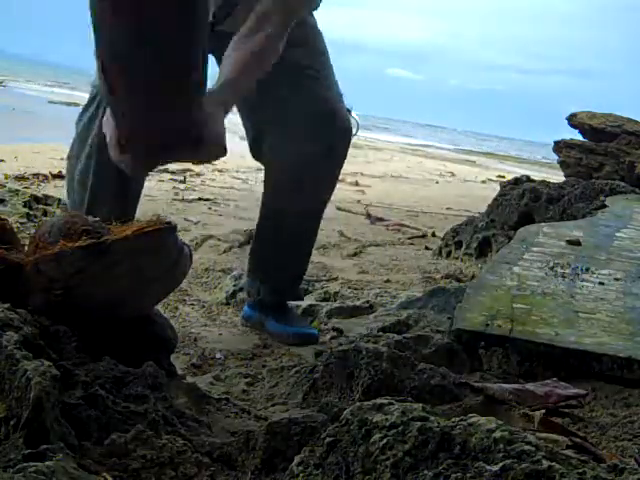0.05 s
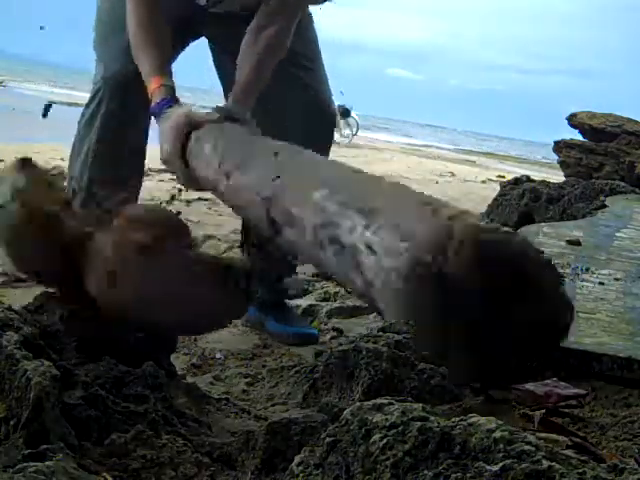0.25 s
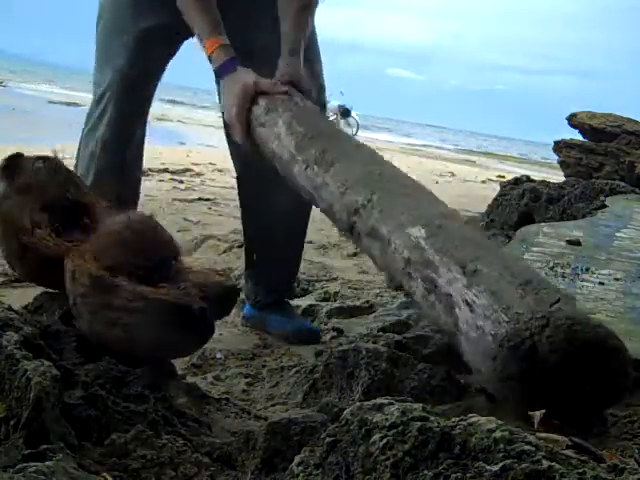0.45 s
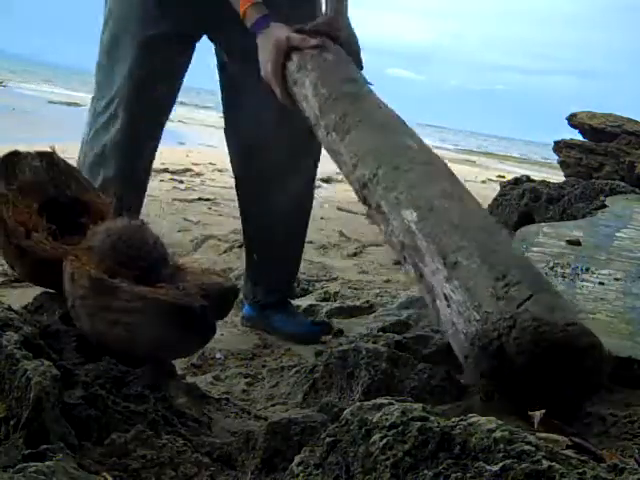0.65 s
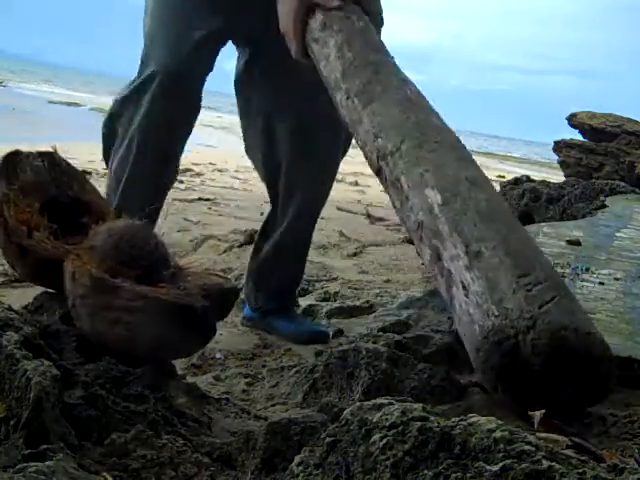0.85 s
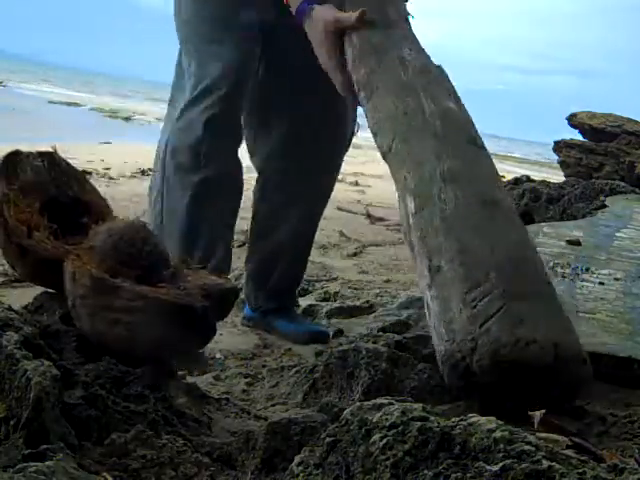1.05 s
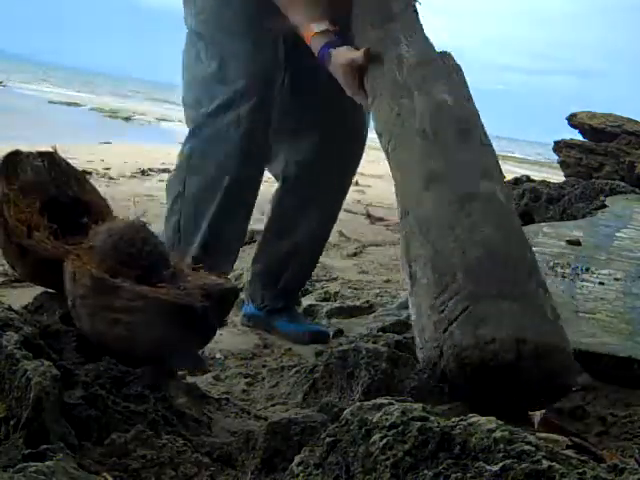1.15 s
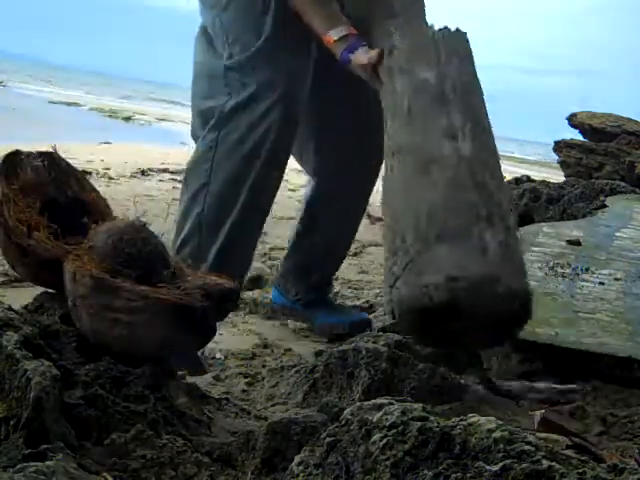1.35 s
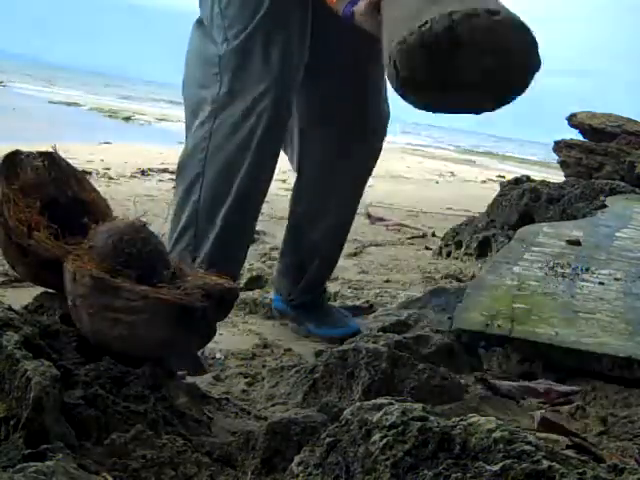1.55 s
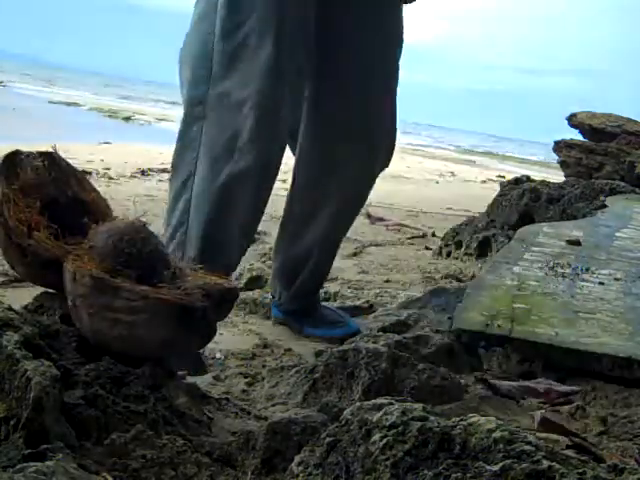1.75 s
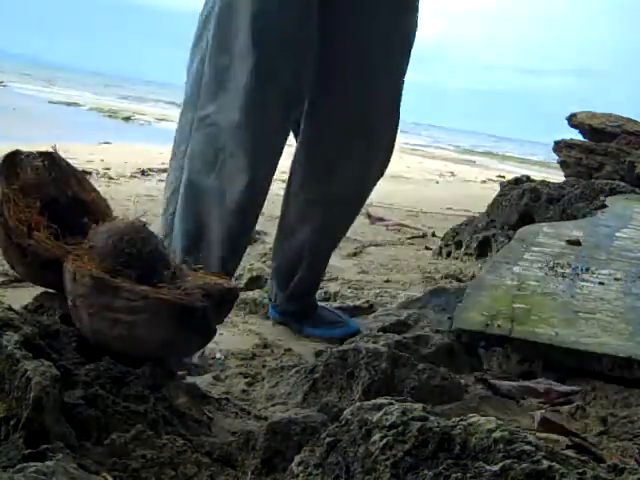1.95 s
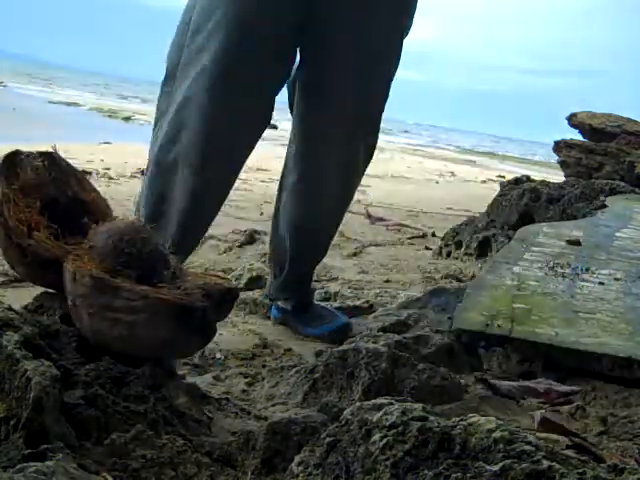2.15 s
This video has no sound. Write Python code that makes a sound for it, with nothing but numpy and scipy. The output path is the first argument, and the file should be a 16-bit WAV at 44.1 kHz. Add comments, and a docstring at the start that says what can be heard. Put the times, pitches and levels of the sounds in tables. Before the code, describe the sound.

Hard, distorted wooden thud of a log striking stone, brief grit, then surf and buffeting wind

```python
"""A windy beach, heard for 2.2 s at two microphone ports: distant surf washes behind from the start, as roar and hiss
of filtered noise, and wind buffets each port on its own, as lumpy low noise and single pressure swings.
After one faint tick a heavy log is slammed onto rock at 0.235 s: a crack of dense grains that overloads the recorder
and a dull wooden ring of decaying modes. Then grit and chips fall, as weaker grains and brief rings."""
import sys
import numpy as np
from scipy import signal
from scipy.fft import rfft, irfft
from scipy.io import wavfile

SR = 44100
rng = np.random.default_rng(int(sys.argv[2]) if len(sys.argv) > 2 else 0)


def wav_out(sig):
    """Save sig, one row per channel (or a flat mono array), as 16-bit PCM at SR to the path in sys.argv[1]."""
    wavfile.write(sys.argv[1], SR, np.round(np.clip(np.atleast_2d(sig).T, -1, 1) * 32767).astype(np.int16))


def volts_from_db(level):
    """Convert decibel levels to linear amplitude ratios."""
    exponent = np.asarray(level, float) / 20
    return 10 ** exponent


N = 97020   # samples, 2.2 s

# How alike the two ports hear surf and grit. Each row: frequency in Hz, likeness from -1 (opposite) to 1 (same).
PORT_LIKENESS = [(60, -0.23), (130, 1), (290, 1), (640, 0.93), (1410, 0.74), (3100, 0.43), (6820, -0.42),
                 (15000, -0.097)]


def rms_one(x):
    """Scale to rms 1."""
    return x / np.sqrt(np.mean(x ** 2) + 1e-20)


def in_time(rows):
    """Columns of a table, after its seconds, as curves in time."""
    s, *columns = np.transpose(rows)
    t = np.arange(N) / SR
    return np.array([np.interp(t, s, column) for column in columns])


def at_hz(points):
    """A spectrum table read on the FFT grid, along log frequency."""
    hz, value = np.transpose(points)
    grid_hz = np.arange(N // 2 + 1) * SR / N
    return np.interp(np.log(grid_hz + 1), np.log(hz), value)


def drift(rate_hz):
    """Slow random wander for two channels, noise through a two-pole lowpass, spread 1."""
    r = np.exp(-2 * np.pi * rate_hz / SR)
    noise = rng.standard_normal((2, N + SR))
    wander = signal.lfilter([1], [1, -2 * r, r * r], noise)
    return rms_one(wander[:, SR:])   # the first second lets the filter settle


def coloured(pair, spectrum, alike):
    """Two unrelated signals mixed to stereo with a likeness per frequency, then coloured; rms 1."""
    mid, side = rfft(pair)
    both = np.sqrt(1 + alike) * mid + np.sqrt(1 - alike) * side * [[1], [-1]]
    return rms_one(irfft(both * volts_from_db(at_hz(spectrum)), N))


def ring(clicks, hz, t60):
    """A two-pole resonator: a unit click sets a decaying sine of starting height 1 ringing."""
    r = volts_from_db(-60 / (t60 * SR))
    w = 2 * np.pi * hz / SR
    return signal.lfilter([0, np.sin(w)], [1, -2 * r * np.cos(w), r * r], clicks + 1e-18)


def panned(db):
    """Gains of left and right for a left-right difference in dB, the nearer side at 1."""
    return volts_from_db(np.array([[min(db, 0)], [min(-db, 0)]]))


def surf():
    """Distant breakers: a low roar and a bright hiss of noise, each flickering a little in level."""
    # Each row: time in seconds, level of the roar in dB, level of the hiss in dB, both before the flicker.
    surf_levels = [(0, -32, -30.5), (.1, -32, -33.5), (.23, -36, -33.5), (.5, -34, -35),
                   (.75, -32.5, -34.5), (1.23, -33.5, -36), (1.67, -35.5, -36.5), (2.2, -34.5, -36)]
    # Spectra of roar and hiss. Each row: frequency in Hz, relative density in dB per Hz.
    roar_spectrum = [(120, -19), (200, -3.5), (400, 0), (530, -1), (610, -4), (700, -10), (1000, -8),
                     (1200, -21.5), (1700, -20.5), (4000, -69)]
    hiss_spectrum = [(700, -9), (1300, 2), (2000, 3), (3000, 0), (4500, 2.5), (9000, 1), (13500, 0.5),
                     (14100, 5), (14400, -45)]
    flicker_db, flicker_hz = 0.77, 5.2
    alike = np.clip(at_hz(PORT_LIKENESS), -1, 1)
    out = 0
    for db, spectrum in zip(in_time(surf_levels), (roar_spectrum, hiss_spectrum)):
        level = volts_from_db(db + flicker_db * drift(flicker_hz)[0])
        out = out + level * coloured(rng.standard_normal((2, N)), spectrum, alike)
    return out


def wind():
    """Turbulence at the ports: lumpy low noise of its own in each, and single pressure swings of about one cycle."""
    # Gusts. Each row: time in seconds, left level in dB, right level in dB, both before the lumps.
    gusts = [(0, -52, -52), (.12, -36, -30.5), (.2, -38, -42), (.3, -26, -29.5), (.45, -26.5, -25),
             (.6, -31.5, -36.5), (.7, -34, -29), (.9, -38, -31), (.97, -60, -44), (1.1, -45, -42),
             (1.3, -39, -40), (1.45, -48, -43.5), (1.6, -48, -37), (1.9, -36.5, -37), (2.05, -44, -40),
             (2.14, -32, -33), (2.2, -45, -43)]
    # Each row: frequency in Hz, relative density in dB per Hz.
    wind_spectrum = [(15, -25), (40, 0.5), (80, 2.5), (130, -0.5), (200, -15), (320, -16), (600, -49)]
    # Single buffets. Each row: centre in seconds, height of the bell in dB at the nearer side,
    # frequency in Hz, left-right difference in dB.
    buffets = [(.15, -18, 114, -17), (0.166, -17, 160, 24), (0.279, -8, 160, -12), (0.29, -9.5, 107, 29),
               (0.352, -15.5, 119, -28), (.403, -4, 200, 5.5), (0.41, -13.5, 120, 2), (.421, -13, 128, 28),
               (0.429, -7, 103, -29), (.453, -10, 224, -24), (.464, -13, 150, 20), (0.545, -15, 178, 28),
               (0.628, -19, 108, -31), (.644, -10.5, 136, -27), (0.673, -9, 163, -11), (.690, -5, 189, -17),
               (0.734, -27, 96, -24), (.789, -7.5, 110, -17), (0.887, -20.5, 81, 6),
               (0.926, -17.5, 121, -22), (1.108, -17, 106, -28), (1.272, -21.5, 110, -12),
               (1.659, -17, 158, 29), (1.846, -21, 86, -24), (1.979, -21, 124, -28),
               (2.015, -19.5, 126, -24), (2.126, -17, 103, -24), (2.139, -14.5, 140, 13),
               (2.103, -26, 110, -24), (2.146, -10.5, 197, -26), (2.157, -10.5, 170, -27),
               (2.181, -17, 136, -24)]
    lumpy_db, lumps_hz = 3, 18
    bell_cycles = 0.32   # standard deviation of a buffet's bell

    level = volts_from_db(in_time(gusts) + lumpy_db * drift(lumps_hz))
    out = level * coloured(rng.standard_normal((2, N)), wind_spectrum, 0)
    t = np.arange(N) / SR
    phases = rng.uniform(0, 2 * np.pi, len(buffets))
    for (s, db, hz, pan_db), phase in zip(buffets, phases):
        cycles = (t - s) * hz
        bell = np.exp(-0.5 * (cycles / bell_cycles) ** 2)
        out = out + panned(pan_db) * volts_from_db(db) * bell * np.cos(2 * np.pi * cycles + phase)
    return out


def ticks():
    """Chips ticking on stone: each is one click that rings a single resonance very briefly."""
    # Each row: start in seconds, level in dB at the nearer side, frequency in Hz,
    # time to fall 60 dB in seconds, left-right difference in dB.
    chips = [(.1376, -21.5, 2630, 0.0064, -1), (.271, -13, 2160, .008, -7), (.4585, -19.5, 990, 0.019, 1),
             (.5335, -24, 2440, 0.011, -6), (.6135, -8.5, 9800, 0.00095, 8), (.703, -23, 8200, .004, 3),
             (1.8098, -19.5, 6840, 0.0032, 1)]
    out = 0
    for s, db, hz, t60, pan_db in chips:
        click = 1.0 * (np.arange(N) == int(s * SR))
        out = out + panned(pan_db) * volts_from_db(db) * ring(click, hz, t60)
    return out


def crunch():
    """Splintering and grit: dense random grains under envelopes that start at once, hold and die."""
    # Each row: start in seconds, level in dB, hold in seconds, time to fall 60 dB in seconds.
    bursts = [(0.2353, -1, 0.0089, 0.019), (0.248, -15.5, 0.014, 0.14), (.4672, -23, 0.0075, .025),
              (.477, -28, 0.0037, 0.023), (.527, -32, 0.01, 0.047), (0.531, -33, 0.06, 0.19)]
    # Each row: frequency in Hz, relative density in dB per Hz.
    grit_spectrum = [(300, -27), (800, 2), (1500, 1), (2500, 2), (4500, 3), (7000, 3), (10000, 4),
                     (13600, 6.5), (14400, -25)]
    grains_per_s, grain_spread_db = 9000, 2.8

    t = np.arange(N) / SR
    envelope = 0
    for s, db, hold, t60 in bursts:
        fall_db = 60 * np.maximum(t - s - hold, 0) / t60
        envelope = envelope + (t >= s) * volts_from_db(db - fall_db)
    size_db = grain_spread_db * np.minimum(rng.exponential(1, (2, N)), 3.5)
    sizes = volts_from_db(size_db) * rng.choice([-1, 1], (2, N))
    grains = sizes * (rng.random((2, N)) < grains_per_s / SR)
    return envelope * coloured(grains, grit_spectrum, np.clip(at_hz(PORT_LIKENESS), -1, 1))


def log():
    """In the short crushing contact many slips strike each mode of the log; the ports hear them slightly apart."""
    # Each row: frequency in Hz, peak of the mode in dB relative to the blow, time to fall 60 dB in seconds.
    modes = [(223, -12, 0.04), (382, -8.5, 0.071), (464, 1, 0.038), (510, -9.5, 0.035), (566, -2, 0.058),
             (894, -1.5, 0.026), (985, -0.5, 0.028), (1130, -13, 0.027), (1690, -12, 0.048),
             (2033, -16, 0.036), (2182, -10, 0.037), (2550, -22, 0.058), (2993, -17.5, 0.066)]
    blow_s, blow_db = 0.2354, 2.5
    contact_s, slips_per_s = 0.005, 2500
    side_share = 0.23   # peak of the left-right difference part, relative to the common part

    t = np.arange(N) / SR - blow_s
    slips = (t >= 0) * (t < contact_s) * (rng.random(N) < slips_per_s / SR)
    out = 0
    for hz, db, t60 in modes:
        mid, side = ring(slips * rng.standard_normal((2, N)), hz, t60)
        mid = mid / np.abs(mid).max()
        side = side_share * side / np.abs(side).max()
        out = out + volts_from_db(blow_db + db) * (mid + side * [[1], [-1]])
    return out


def scene():
    """All sources at the two ports."""
    return surf() + wind() + ticks() + crunch() + log()


def causal(points):
    """Minimum-phase response with the gain of a table, by folding its cepstrum forward in time."""
    cepstrum = irfft(np.log(volts_from_db(at_hz(points))), N)
    cepstrum[1:N // 2] *= 2
    cepstrum[N // 2 + 1:] = 0
    return np.exp(rfft(cepstrum))


def low_pass(x):
    """Removes everything above the highest recorded frequency."""
    return signal.sosfilt(signal.butter(12, 15820, fs=SR, output="sos"), x)


def record(dry):
    """Port colour; gain control sinks after loud peaks; overload is cut flat, then both ends are rolled off."""
    # Response of each microphone port, with its cavity peak. Each row: frequency in Hz, gain in dB.
    left_port = [(200, -1), (3000, 0), (6000, -1), (7000, -2), (8000, 4.5), (8600, 1), (9200, -2.5),
                 (10000, -8), (11000, -12), (13000, -16), (14500, -21), (17000, -16)]
    right_port = [(200, 0.5), (3000, 1), (5000, 1.5), (6200, 7.5), (7000, 0.5), (7500, -8), (8000, -4),
                  (9000, -17), (10000, -15), (11000, -19.5), (13000, -31), (14500, -30), (17000, -44)]
    limit_db, squeeze = -12.5, 0.38   # squeeze: dB of gain taken per dB over the limit
    recover_db_per_s, react_s = 51, 0.075
    clip = 1
    top_hz, bottom_hz = 15100, 41.7

    heard = irfft(rfft(dry) * [causal(left_port), causal(right_port)], N)
    peak = np.minimum(np.abs(heard).max(axis=0), clip)
    over_db = np.maximum(20 * np.log10(peak + 1e-9) - limit_db, 0) * squeeze
    # hold each peak, letting it fall at the recovery rate, then smooth
    ramp = recover_db_per_s * np.arange(N) / SR
    held_db = np.maximum.accumulate(over_db + ramp) - ramp
    r = np.exp(-1 / (react_s * SR))
    duck_db = signal.lfilter([1 - r], [1, -r], held_db)
    clipped = np.clip(heard * volts_from_db(-duck_db), -clip, clip)
    lowpass = signal.butter(4, top_hz, fs=SR, output="sos")
    highpass = signal.butter(2, bottom_hz, "high", fs=SR, output="sos")
    mix = signal.sosfilt(np.r_[lowpass, highpass], clipped)
    return low_pass(mix)


dry = scene()
out = record(dry)
wav_out(out)
```